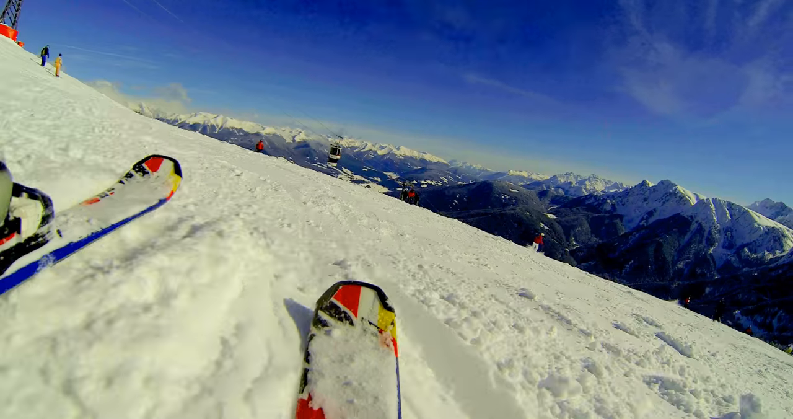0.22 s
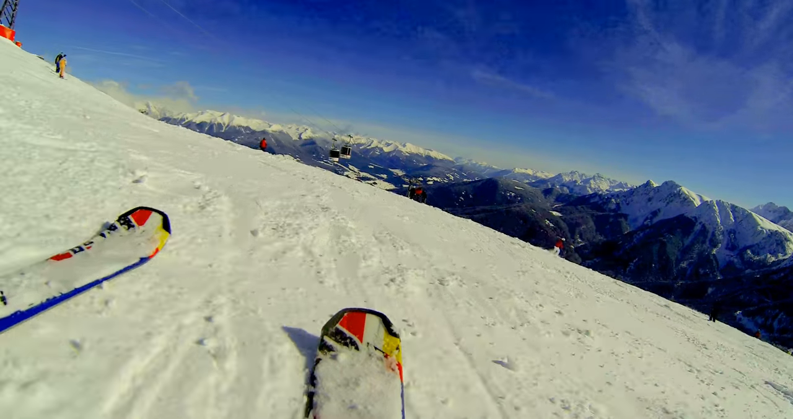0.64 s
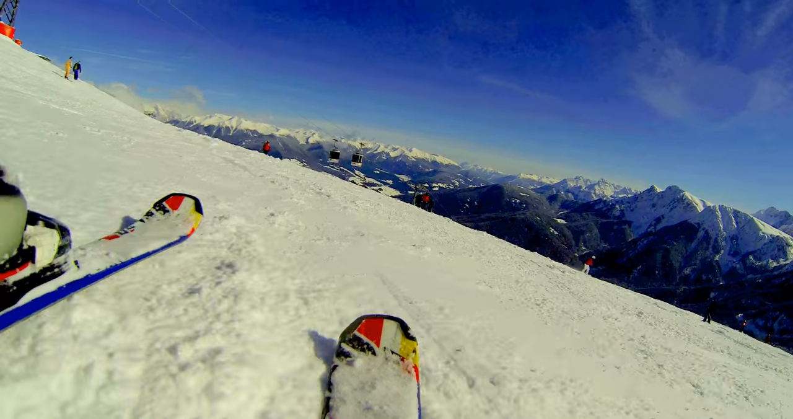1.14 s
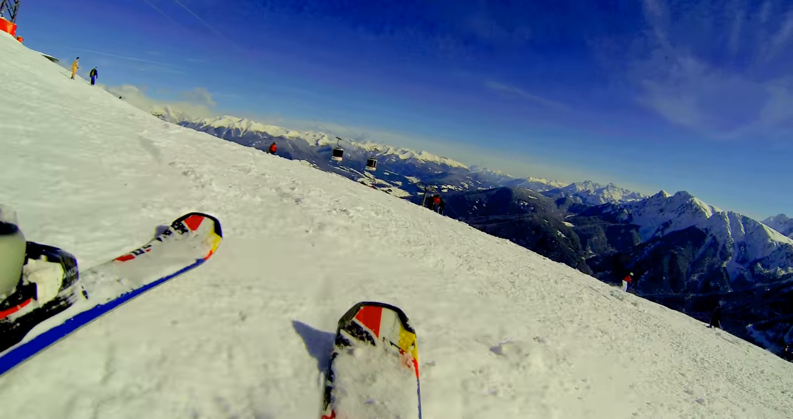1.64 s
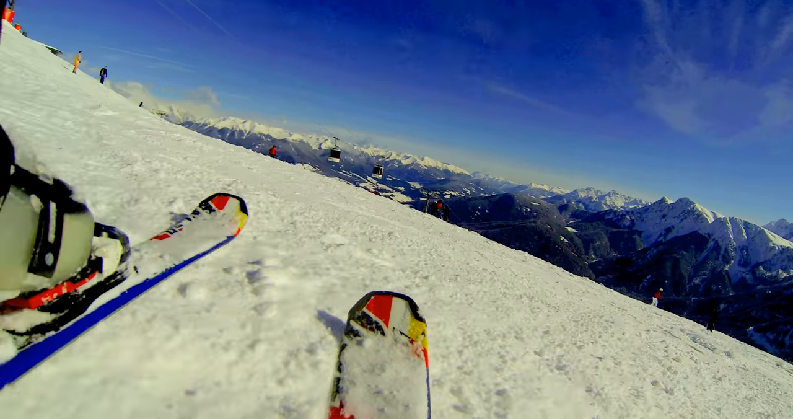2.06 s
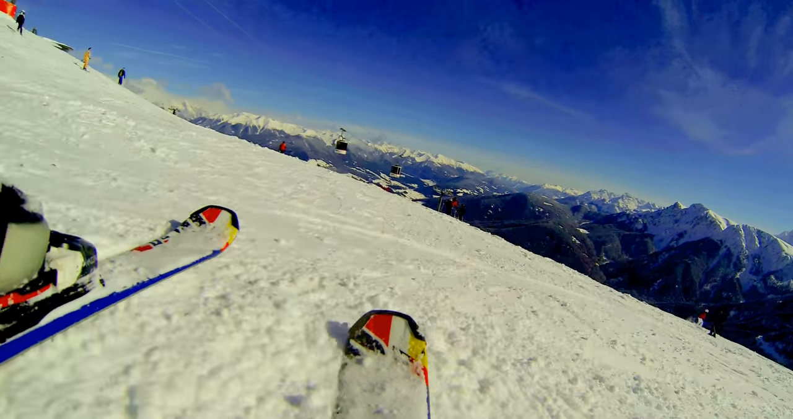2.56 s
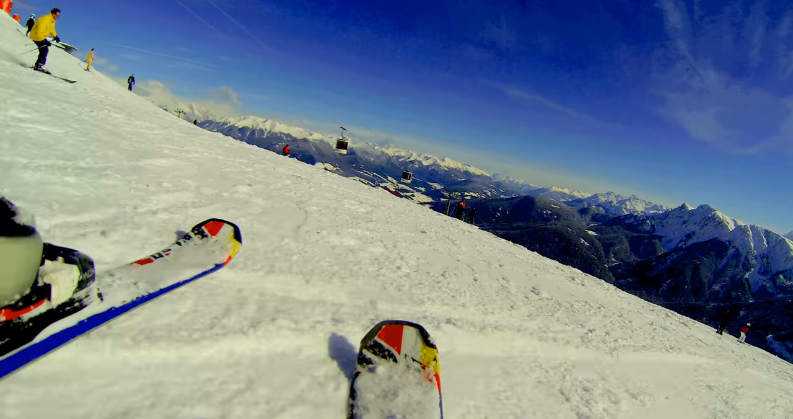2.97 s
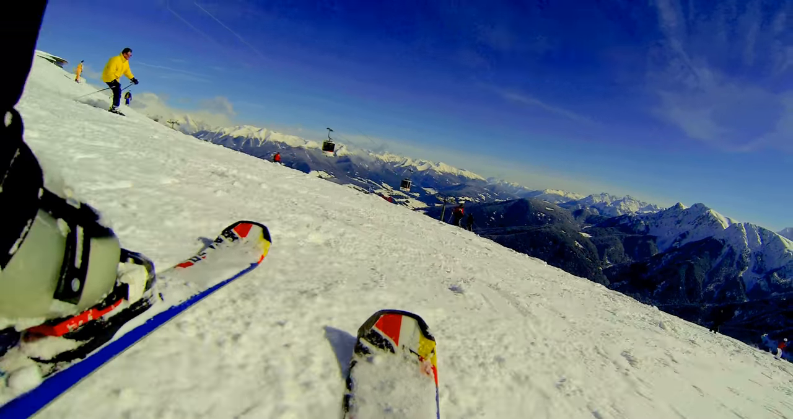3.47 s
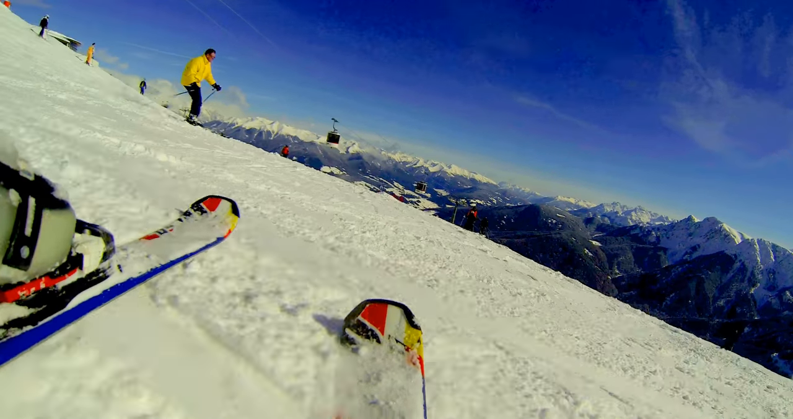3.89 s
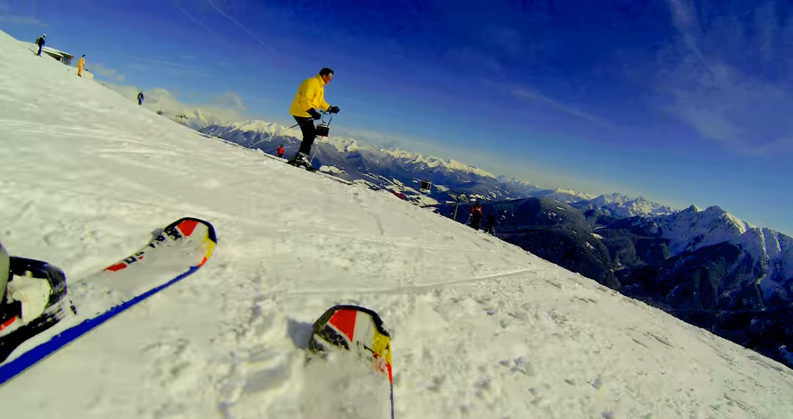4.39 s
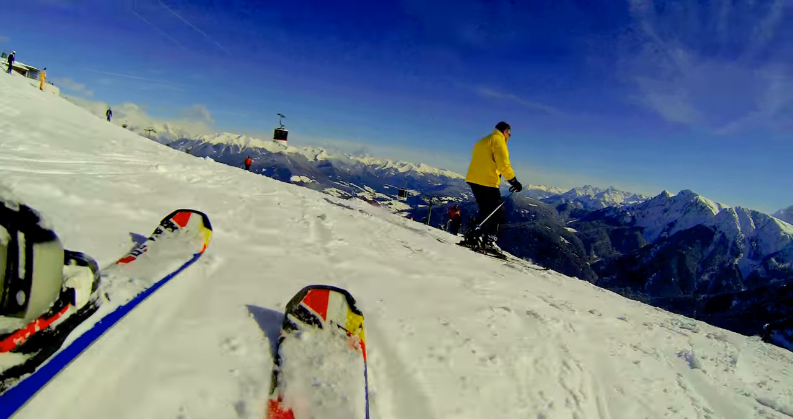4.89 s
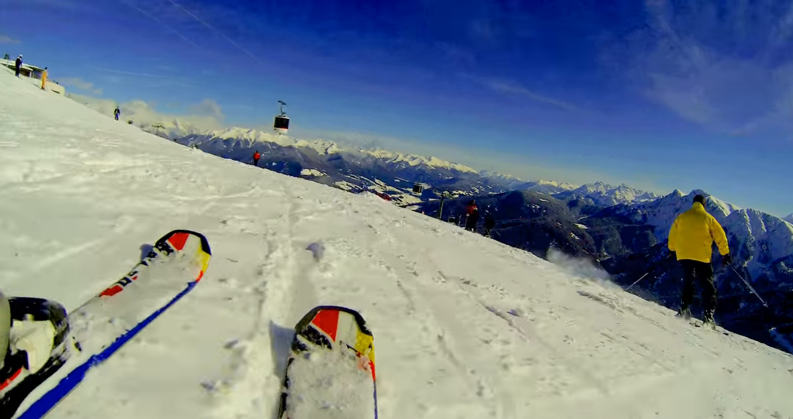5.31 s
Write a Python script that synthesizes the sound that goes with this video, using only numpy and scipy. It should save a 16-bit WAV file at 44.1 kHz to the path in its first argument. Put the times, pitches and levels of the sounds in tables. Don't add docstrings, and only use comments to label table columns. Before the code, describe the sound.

Close, bumpy ski run: deep fluttering rumble, hard plasticky clacks in bursts, dull thuds on ice lumps, brief rubbery groans, thin snow hiss.

```python
import sys
import numpy as np
from scipy import signal
from scipy.io import wavfile
from scipy.ndimage import uniform_filter1d

SR = 44100
rng = np.random.default_rng(int(sys.argv[2]) if len(sys.argv) > 2 else 0)


def output_pcm(signal):
    pcm = np.clip(np.atleast_2d(signal).T, -1, 1) * 32767
    wavfile.write(sys.argv[1], SR, np.round(pcm).astype(np.int16))


def nominal_scale(level):
    x = np.asarray(level, float) / 20
    return 10 ** x


N = 244314

# time_s, level_db
BENDING = [(0.0, -23), (0.299, -22), (0.369, -22.5), (0.399, -14.5), (0.439, -38), (0.479, -12),
           (0.524, -42), (0.624, -19), (0.659, -34), (0.693, -17.5), (0.778, -14), (0.943, -40),
           (1.008, -23.5), (1.152, -34.5), (1.397, -20.5), (1.512, -30), (1.576, -19.5), (1.676, -30),
           (1.716, -14), (1.791, -19), (2.05, -35.5), (2.17, -17), (2.29, -28), (2.514, -25), (2.559, -33),
           (2.639, -16), (2.694, -24), (2.729, -14.5), (2.794, -32.5), (2.814, -19), (2.903, -23),
           (2.923, -24), (2.958, -22.5), (3.193, -30.5), (3.307, -19.5), (3.362, -23), (3.422, -16),
           (3.517, -30), (3.602, -20), (3.786, -27), (3.881, -20.5), (3.951, -19.5), (3.971, -26),
           (3.996, -18), (4.071, -18.5), (4.141, -19), (4.185, -38), (4.25, -28), (4.31, -21.5),
           (4.39, -43), (4.47, -28), (4.535, -21), (4.62, -26), (4.849, -31.5), (4.984, -20), (5.019, -20),
           (5.118, -19.5), (5.228, -33.5), (5.293, -36), (5.423, -26.5), (5.473, -20), (5.537, -22)]
# start_s, peak_db, treble_db (relative to the peak)
KNOCKS = [(0.0677, -11.5, -11.5), (0.086, -11, -13), (0.124, -19, -17), (0.1575, -15.5, -18),
          (0.3019, -10, -9), (0.3055, -13.5, -23), (0.3926, -7, -11), (0.4021, -18, -12),
          (0.4111, -19.5, -16), (0.4793, -4.5, -13), (0.4824, -13, -9), (0.6962, -7, -12),
          (0.702, -15, -20), (0.7257, -13, -17), (0.7416, -5.5, -13), (0.7528, -7, -20), (0.759, -5, -31),
          (0.7596, -5, -22), (0.7705, -0.5, -36), (0.7756, -9, -31), (0.779, -22, 2), (0.7891, -7, -24),
          (0.7931, -1.5, -24), (0.807, -2.5, -39), (0.8123, -8, -27), (0.8672, -17, -13),
          (1.011, -13, -9.5), (1.0313, -15.5, -11), (1.0933, -10.5, -10), (1.3455, -17, -16),
          (1.371, -16, -16), (1.3967, -16, -23), (1.3985, -8.5, -19), (1.4069, -4.5, -12),
          (1.4175, -14, -15), (1.421, -9, -31), (1.426, -12, -9), (1.447, -14.5, -12), (1.5644, -8.5, -11),
          (1.5838, -7.5, -11.5), (1.709, -17, -26), (1.7235, -14, -14), (1.73, -18, -8),
          (1.7405, -5.5, -11), (1.762, -9, -10), (1.7919, -5, -12), (1.8022, -7.5, -20), (1.806, -4, -30),
          (1.8164, -5.5, -14), (1.8297, -20, -17), (1.8383, -9.5, -12), (1.8492, -13, -10),
          (1.86, -15, -20), (1.868, -17, -11), (1.877, -3.5, -24), (1.8812, -7.5, -21), (1.885, -14, -10),
          (1.895, -14, -20), (1.9059, -13, -12.5), (2.1364, -9.5, -10), (2.1453, -25, -11),
          (2.149, -9, -25), (2.1534, -9.5, -9), (2.1625, -2.5, -19), (2.1659, -9, -28), (2.1697, -11, -14),
          (2.1816, -9, -9), (2.1855, -5.5, -33), (2.1901, -12, -13), (2.2042, -14, -12),
          (2.9533, -4, -11.5), (2.9642, -16, -16), (3.3184, -15, -20), (3.3865, -23, -19),
          (3.389, -4.5, -12), (3.407, -19, -8), (3.424, -5.5, -13), (3.4401, -14.5, -14),
          (3.5814, -16, -18), (3.5916, -16, -24), (3.5983, -14, -12), (4.0331, -4, -11), (4.0365, -21, -21),
          (4.044, -12, -15), (4.0471, -10, -27), (4.052, -5, -14), (4.0564, -16, -18), (4.0632, -1.5, -20),
          (4.067, -15, -27), (4.0703, -15, -5), (4.0969, -15, -11), (4.1, -26, -28), (4.104, -18.5, -13),
          (4.1199, -16, -25), (4.1232, -16, -9.5), (4.279, -10.5, -19), (4.2917, -11.5, -11),
          (4.2995, -8.5, -25), (4.307, -10.5, -12), (4.3241, -9, -13), (4.6169, -13, -15.5),
          (4.6655, -11.5, -26), (4.6719, -17, -13), (4.9757, -19, -15), (4.9829, -20.5, -27),
          (4.9847, -3, -13), (4.9966, -15, -32), (5.037, -11, -21), (5.0395, -5.5, -11.5), (5.06, -20, -16),
          (5.0635, -10, -11), (5.091, -14.5, -13), (5.1165, -14, -17)]
# start_s, peak_db
MORE_KNOCKS = [(0.2949, -24), (0.469, -13), (0.537, -17.5), (0.69, -24), (0.8152, -24), (0.89, -18),
               (1.0914, -25), (1.2854, -17.5), (1.3884, -26), (1.72, -24), (1.7524, -19), (1.7814, -25),
               (1.875, -24), (1.8997, -25), (2.1289, -18), (2.2618, -24), (2.5304, -22), (2.736, -21),
               (2.857, -22.5), (2.9439, -18), (3.0368, -40), (3.0408, -16.5), (3.4205, -32), (3.4274, -28),
               (4.0124, -17.5), (4.0825, -15), (4.0851, -11), (4.0877, -20), (4.138, -22), (4.1854, -23),
               (4.2765, -27), (4.2872, -19), (4.388, -21), (4.5614, -18), (4.649, -23), (4.6858, -17),
               (5.0105, -20), (5.0876, -8)]
# start_s, end_s, rate_per_s, peak_db
CHATTER = (4.1885, 4.21, 300, -27)
# pitch_hz, width_hz, level_db
SHELL_MODES = [(1090, 290, -9.5), (1640, 210, -4.5), (1988, 210, 0), (2584, 270, 1.5), (3050, 350, -4),
               (4120, 400, -12.5)]
# pitch_hz, width_hz, level_db
LATCH_MODES = [(5180, 780, -7.5), (8400, 700, -16.5), (9940, 560, -25), (12900, 3900, -16)]
# time_s, level_db, slip_rate_hz
GROANS = [
    [(0.424, -14, 192), (0.454, -25, 278.4), (0.504, -24, 253), (0.534, -12.5, 285), (0.544, -37, 301)],
    [(1.063, -21, 241), (1.093, -17, 243.4), (1.122, -28.5, 324), (1.137, -14, 280)],
    [(1.172, -19.5, 224.7), (1.252, -12.5, 234), (1.267, -7.5, 271), (1.282, -10.5, 326.7),
     (1.332, -20.5, 374)],
    [(1.432, -29, 207.3), (1.467, -17, 247), (1.522, -30, 206.4), (1.537, -19, 209.3), (1.586, -25, 279.5),
     (1.616, -12, 200)],
    [(1.881, -20, 232), (1.896, -26.5, 240), (1.931, -19.5, 346), (1.936, -39, 350)],
    [(2.395, -10.5, 296), (2.429, -19.5, 227), (2.439, -21, 345), (2.459, -24, 246)],
    [(2.494, -22, 242), (2.514, -13.5, 190), (2.539, -28, 192), (2.549, -18, 210)],
    [(2.834, -15, 303), (2.859, -10.5, 316), (2.868, -19, 240), (2.878, -15, 242)],
    [(2.993, -33, 225), (3.048, -14, 309.4), (3.083, -11.5, 255.4), (3.123, -23.5, 404.7),
     (3.173, -15.5, 267.3), (3.198, -21, 246)],
    [(3.253, -7, 303), (3.273, -27, 303), (3.283, -16, 218), (3.307, -16.5, 245)],
    [(3.602, -14, 175.3), (3.662, -30, 310), (3.702, -13.5, 269.4), (3.712, -9, 286), (3.717, -21, 383.3)],
    [(3.737, -10, 215.4), (3.751, -16, 232), (3.806, -13.5, 231.4), (3.856, -15.5, 203), (3.871, -16, 270)],
    [(3.906, -4, 186), (3.916, -9.5, 189.3), (3.921, -7, 194), (3.946, -24, 192)],
    [(4.111, -15, 294), (4.121, -19, 239.4), (4.2, -15, 297.6), (4.21, -2, 320)],
    [(4.27, -16.5, 213.7), (4.305, -15, 181), (4.315, -13, 206.5), (4.365, -27, 220)],
    [(4.659, -18, 231.3), (4.669, -13, 244.5), (4.694, -14.5, 246), (4.719, -32, 289)],
    [(5.073, -7, 280), (5.123, -15, 204.7), (5.153, -25, 310), (5.158, -26, 339)],
    [(5.183, -32, 333), (5.213, -11, 300.3), (5.233, -27, 269), (5.263, -16.5, 328), (5.318, -23, 204)],
]
# multiple, level_db
SLIP_OVERTONES = [(1, 6.5), (2, -5), (3, -17), (4, -53), (5, -51)]
# start_s, peak_db, pitch_hz
ICE_LUMPS = [(0.202, -18, 250), (0.251, -2.5, 230), (0.288, -10, 239), (0.305, 3.5, 231),
             (0.317, -4.5, 180), (0.375, -13, 322), (0.425, -3, 183), (0.444, 0, 272), (0.469, 0.5, 290),
             (0.52, 0.5, 286), (0.685, 1, 305), (0.711, -20, 202), (1.201, -15, 240), (1.361, -4, 272),
             (1.395, 2.5, 252), (1.419, 0.5, 217), (1.713, -7, 244), (1.776, -11, 203), (1.805, -1, 288),
             (1.835, -1.5, 181), (1.874, -2, 223), (2.215, -11, 179), (2.233, -3, 210), (2.629, -9, 191),
             (2.674, -0.5, 202), (2.716, 0.5, 181), (2.811, 0.5, 315), (2.966, -2, 288), (3.279, 1, 225),
             (3.41, -3.5, 210), (3.438, -5, 197.7), (3.642, -6, 223), (3.907, 3, 194), (3.984, -7, 347.5),
             (4.036, -14, 188), (4.604, -7.5, 288), (4.931, -12, 181), (4.994, -2.5, 313),
             (5.074, -17, 280), (5.447, -7.5, 267)]
# time_s, level_db
ROUGHNESS = [(0.0, -27), (0.075, -39.5), (0.135, -35), (0.234, -36), (0.244, -30), (0.294, -27),
             (0.404, -33), (0.439, -28), (0.499, -29), (0.529, -26.5), (0.584, -43.5), (0.698, -20),
             (0.733, -35.5), (0.783, -26), (1.028, -38.5), (1.093, -27.5), (1.137, -41), (1.217, -23),
             (1.342, -34), (1.407, -26), (1.452, -29.5), (1.596, -32), (1.686, -42), (1.716, -25.5),
             (1.826, -35.5), (1.886, -26), (1.946, -39), (2.01, -44.5), (2.175, -26.5), (2.295, -32.5),
             (2.38, -33.5), (2.415, -20), (2.479, -32), (2.534, -23.5), (2.564, -33), (3.028, -24),
             (3.143, -33), (3.293, -26.5), (3.582, -31.5), (3.642, -22.5), (3.717, -27), (3.801, -21),
             (3.891, -38), (3.921, -22), (3.966, -43), (3.986, -31), (4.056, -26.5), (4.096, -26.5),
             (4.195, -31), (4.235, -38), (4.31, -22), (4.415, -40), (4.644, -31), (4.684, -23.5),
             (4.764, -44.5), (5.113, -22.5), (5.173, -40), (5.208, -28), (5.243, -35), (5.293, -25),
             (5.363, -37), (5.537, -31)]
# pitch_hz, width_hz, level_db
SKI_MODES = [(444, 113, 2.5), (691, 239, 4), (740, 138, 6), (947, 53, -13), (1083, 112, -13)]
# time_s, level_db
HISS_LEVEL = [(0.0, -39.5), (0.51, -40), (0.69, -38.5), (0.96, -44), (1.08, -41), (1.48, -39),
              (1.73, -36.5), (2.05, -38), (2.2, -45.5), (2.5, -43), (2.93, -38), (3.32, -41), (3.55, -34.5),
              (3.84, -39), (4.2, -44), (4.29, -41), (4.89, -39), (5.12, -36.5), (5.54, -36.5)]
# pitch_hz, density_db (per Hz)
HISS_SPECTRUM = [(700, -15), (1100, -0.5), (1300, -12), (1600, 3), (2400, -7), (3400, -6.5), (4500, -18.5),
                 (6000, -25), (8500, -27.5), (10000, -36), (12500, -34), (15200, -53)]

CONTACT_S = 0.0007


def thrum(t):
    mode_hz = 58 * (1 + 0.06906 * drift(N, 3.96))
    turns = np.cumsum(mode_hz * (1 + 0.0904 * drift(N, 23.4))) / SR
    tone = np.sin(2 * np.pi * turns) + 0.23 * np.sin(4 * np.pi * turns + 1.15)
    buffet = resonate(rng.standard_normal(N), mode_hz, 60)
    buffet = resonate(buffet, mode_hz, 110)
    flutter_db = 1.5 * drift(N, 20)
    level_db = curves(BENDING, t)[0] + flutter_db
    return nominal_scale(level_db) * (evened(tone) + 1.07 * evened(buffet))


def ring(modes, chance, hold, contact, t):
    wave = 0
    for (hz, width, db), (a, b) in zip(modes, chance):
        turns = hz * (1 + 0.04 * a) * (t - CONTACT_S) + 0.23 * b
        wave = wave + nominal_scale(db + 1.6 * a) * np.exp(-hold * width * t) * np.sin(2 * np.pi * turns)
    return contact * wave / abs(contact * wave).max()


def knock(peak_db, treble_db, chance):
    t = np.arange(500) / SR
    softness = np.clip(-(treble_db + 12) / 18, 0, 1)
    onset = 1 - np.exp(-(t / 0.0006) ** 2)
    contact = onset * (np.exp(-(t / 0.0012) ** 2) + 0.15 + 0.25 * softness)
    snap = np.exp(-((t - CONTACT_S) / 0.001) ** 2) + 0.22
    shell_count = len(SHELL_MODES)
    shell = ring(SHELL_MODES, chance[:shell_count], 1.26, contact, t)
    latch = ring(LATCH_MODES, chance[shell_count:], 2.4, contact, t)
    return nominal_scale(peak_db) * (shell + nominal_scale(treble_db) * snap * latch)


def rattle(t):
    start, end, per_s, chatter_db = CHATTER
    touches = MORE_KNOCKS + [(s, chatter_db) for s in np.arange(start, end, 1 / per_s)]
    knocks = KNOCKS + [(s, peak_db, -21) for s, peak_db in touches]
    chances = rng.standard_normal((len(knocks), len(SHELL_MODES + LATCH_MODES), 2))
    out, shake = np.zeros(N), np.zeros(N)
    for (s, peak_db, treble_db), chance in zip(knocks, chances):
        add(out, s - CONTACT_S, knock(peak_db, treble_db, chance))
        add(shake, s - 0.007, nominal_scale(peak_db) * signal.windows.hann(500))
    scuff = nominal_scale(-19) * shake * evened(grains(2000, 3.7))
    buzz = nominal_scale(1.304 * curves(BENDING, t)[0] - 5) * evened(grains(120, 1.4))
    crunch = nominal_scale(1.65 * curves(ROUGHNESS, t)[0] - 2) * evened(grains(500, 3.2))
    shell = dull(body(scuff + buzz + crunch, SHELL_MODES), 5200)
    latch_modes = [(hz, width, db + 0.5) for hz, width, db in LATCH_MODES]
    return out + shell + body(scuff + buzz / 4, latch_modes)


def groan(rows):
    t = np.arange(rows[0][0], rows[-1][0], 1 / SR)
    count = len(t)
    level_db, slip_hz = curves(rows, t)
    turns = np.cumsum(slip_hz * (1 + 0.057 * drift(count, 70.6))) / SR
    slips = sum(nominal_scale(db) * np.cos(k * (2 * np.pi * turns + 0.85)) for k, db in SLIP_OVERTONES)
    slips = slips * (1 + 0.25 * drift(count, 10.3) * np.cos(np.pi * turns))
    flutter_db = 1.6 * drift(count, 60)
    fade = signal.windows.tukey(count, 0.12)
    return t[0], -nominal_scale(level_db + flutter_db) * evened(slips) * fade


def lump(peak_db, hz):
    t = np.arange(2200) / SR
    swing = np.sin(2 * np.pi * hz * t) * np.exp(-t / 0.0043)
    sharp = 0.27 * np.sin(4.4 * np.pi * hz * t) * np.exp(-t / 0.0036)
    return -nominal_scale(peak_db - 1.5) * dull(swing + sharp, 1300)


def scrape(t):
    crunch = body(grains(700, 3.9), SKI_MODES)
    bumps = grains(200, 1.86)
    low = resonate(resonate(bumps, 248, 250), 192, 270)
    low = low + 0.22 * resonate(bumps, 136, 69)
    groaning = sum((t > rows[0][0]) & (t < rows[-1][0]) for rows in GROANS)
    low_db = 8 - 1.83 * uniform_filter1d(1. * groaning, size=600)
    flutter_db = 2.5 * drift(N, 30)
    level_db = curves(ROUGHNESS, t)[0] + flutter_db
    return nominal_scale(level_db) * dull(evened(crunch) + nominal_scale(low_db) * evened(low), 1370)


def hiss():
    frames, hz = N // 64 + 5, np.fft.rfftfreq(256, 1 / SR)
    real, imaginary, patches = rng.standard_normal((frames, len(hz), 3)).T
    patches = uniform_filter1d(patches, 4, axis=0)
    patches = evened(uniform_filter1d(patches, 30, axis=1))
    flicker = evened(uniform_filter1d(rng.standard_normal(frames), 3))
    pitch_hz, density_db = np.transpose(HISS_SPECTRUM)
    shape_db = np.interp(np.log(hz + 1), np.log(pitch_hz), density_db, left=-60, right=-90)
    spectra = (real + 1j * imaginary) * nominal_scale(shape_db[:, None] + 2 * patches + flicker)
    return evened(signal.istft(spectra, nperseg=256, noverlap=192)[1][:N])


def grains(per_s, spread_db):
    size = nominal_scale(spread_db * np.minimum(rng.exponential(1, N), 5))
    sign = rng.choice([-1, 1], N)
    return size * sign * (rng.random(N) < per_s / SR)


def drift(count, hz):
    low_pass = signal.butter(2, min(hz, 9000), fs=SR)
    return evened(signal.lfilter(*low_pass, rng.standard_normal(count)))


def resonate(x, hz, width):
    turn = np.exp(2j * np.pi * np.cumsum(hz * np.ones(len(x))) / SR)
    r = np.exp(-np.pi * width / SR)
    smooth = signal.lfilter([1 - r], [1, -r], x / turn + 1e-18)
    return 2 * (turn * smooth).real


def body(x, modes):
    return sum((-1) ** k * nominal_scale(db) * resonate(x, hz, width) for k, (hz, width, db) in enumerate(modes))


def dull(x, hz):
    return signal.sosfilt(signal.butter(4, hz, fs=SR, output="sos"), x)


def evened(x):
    return x / np.sqrt(np.mean(x ** 2) + 1e-20)


def curves(rows, t):
    s, *columns = np.transpose(rows)
    return [np.interp(t, s, c) for c in columns]


def add(mix, s, sound):
    part = mix[round(s * SR):][:len(sound)]
    part += sound[:len(part)]


def scene():
    t = np.arange(N) / SR
    ski = thrum(t) + scrape(t)
    for rows in GROANS:
        add(ski, *groan(rows))
    for s, peak_db, hz in ICE_LUMPS:
        add(ski, s, lump(peak_db, hz))
    rough_db = 0.14 * (curves(ROUGHNESS, t)[0] + 32)
    hiss_db = curves(HISS_LEVEL, t)[0] + rough_db - 3
    return (ski + rattle(t) + nominal_scale(hiss_db) * hiss())[None]


def roll_off(x):
    return signal.sosfilt(signal.butter(12, 15850, fs=SR, output="sos"), x)


def record(dry):
    cut = signal.lfilter(*signal.butter(2, 30, "high", fs=SR), dry)
    cut = signal.lfilter(*signal.butter(10, 15350, fs=SR), cut)
    limited = 0.97 * np.tanh(cut / 1.018)
    return roll_off(limited)


dry = scene()
out = record(dry)
output_pcm(out)
```